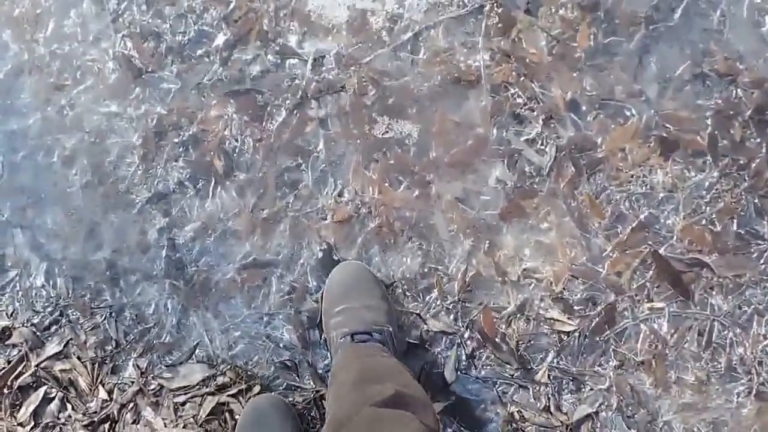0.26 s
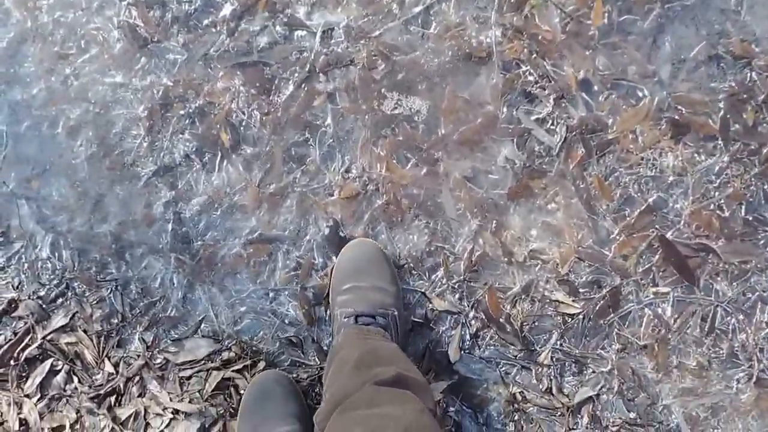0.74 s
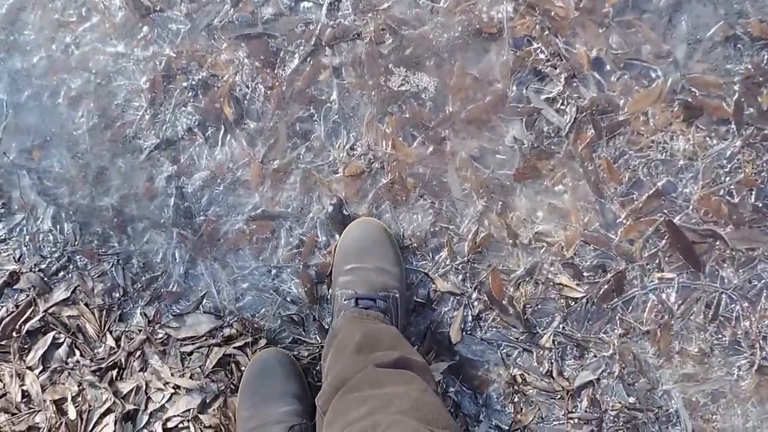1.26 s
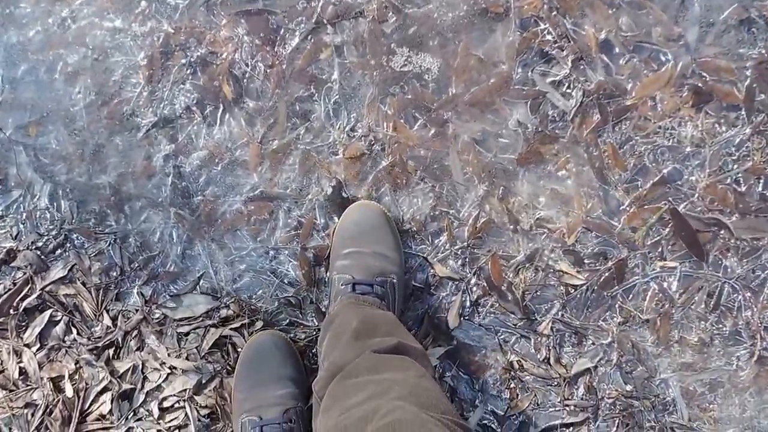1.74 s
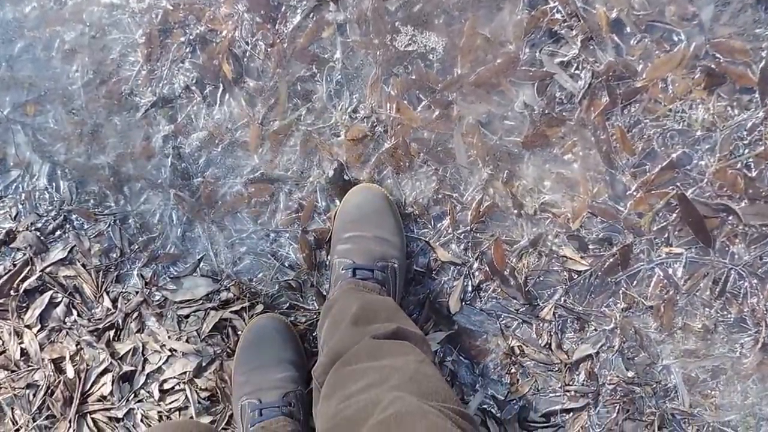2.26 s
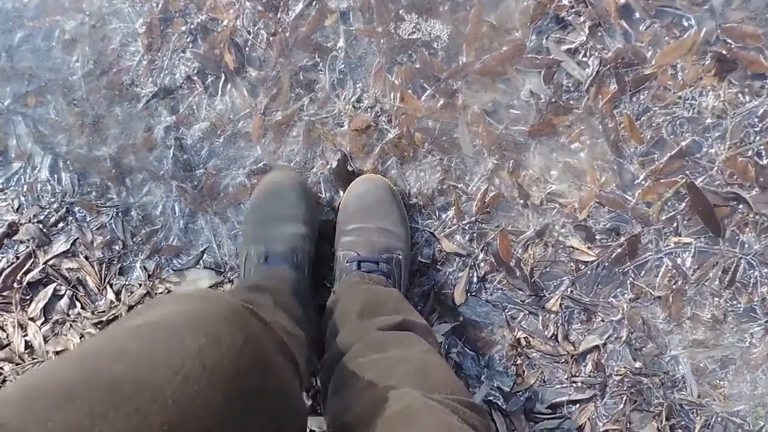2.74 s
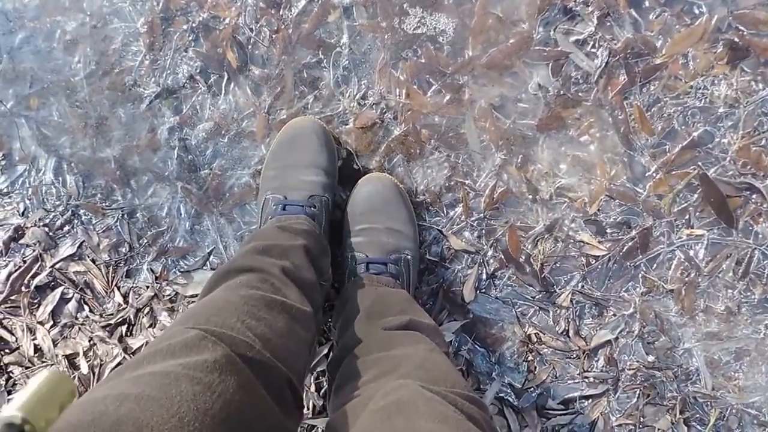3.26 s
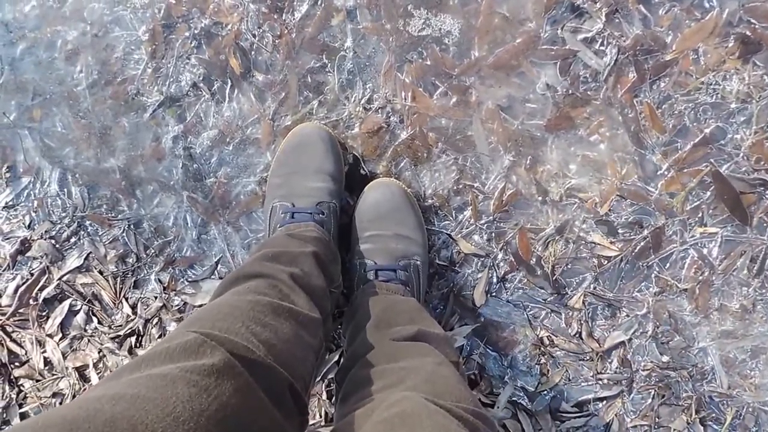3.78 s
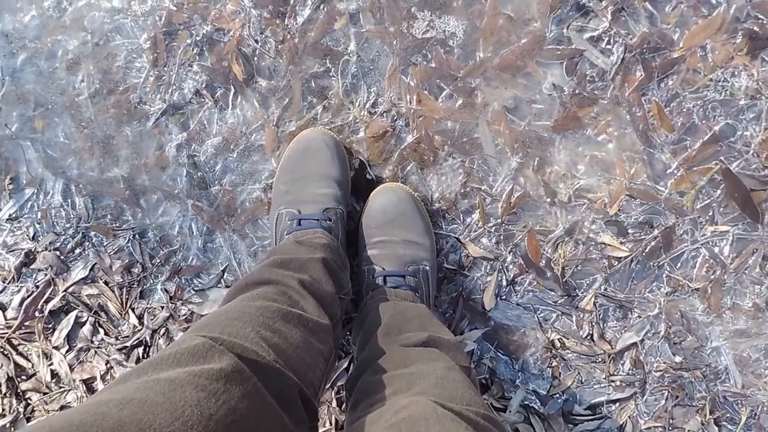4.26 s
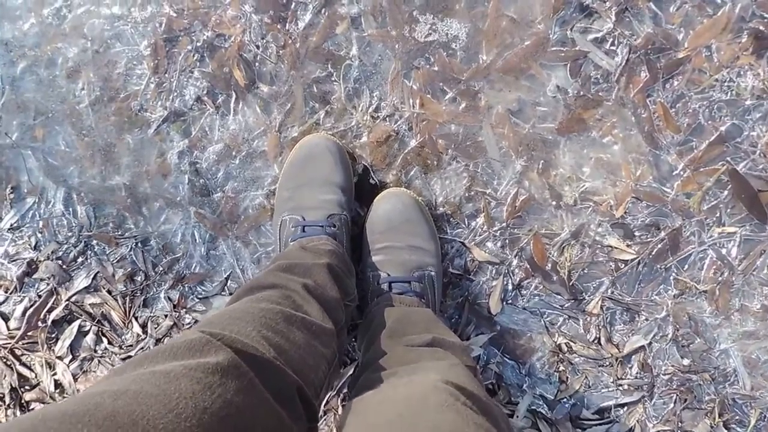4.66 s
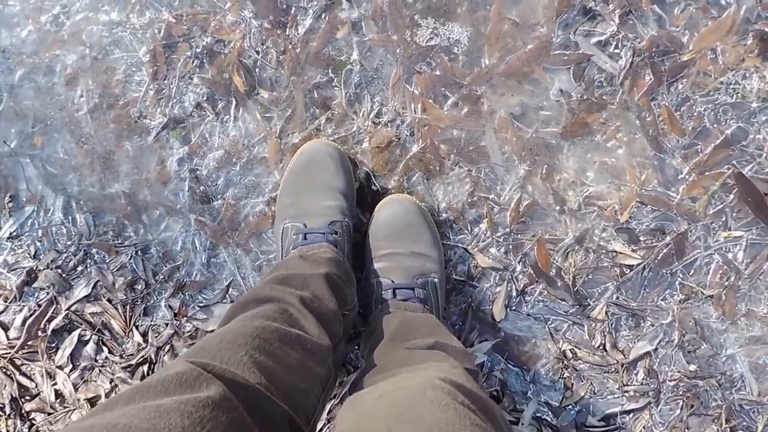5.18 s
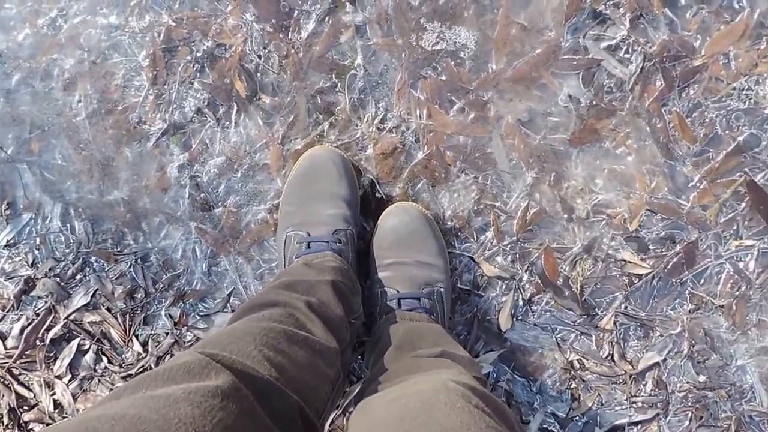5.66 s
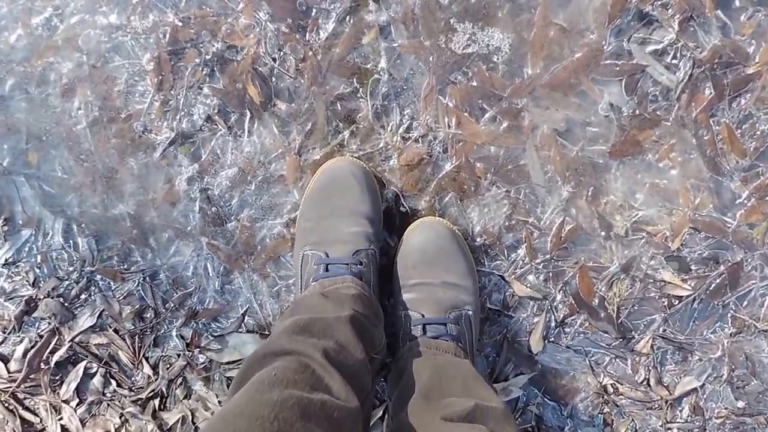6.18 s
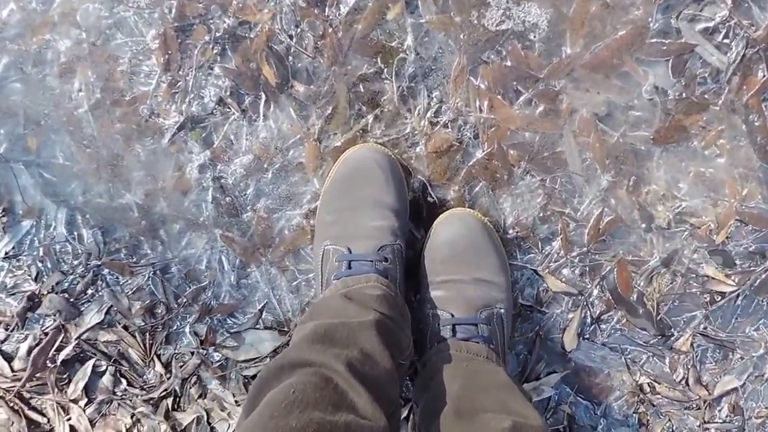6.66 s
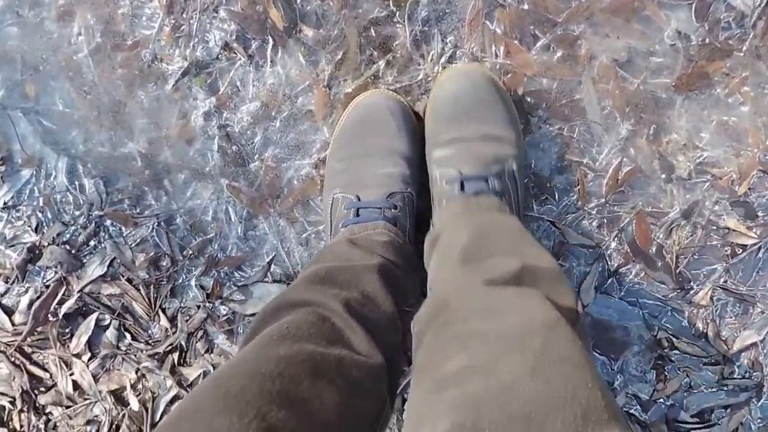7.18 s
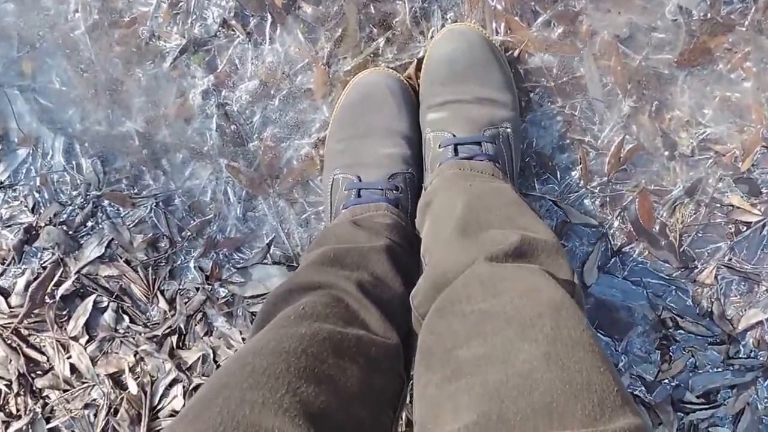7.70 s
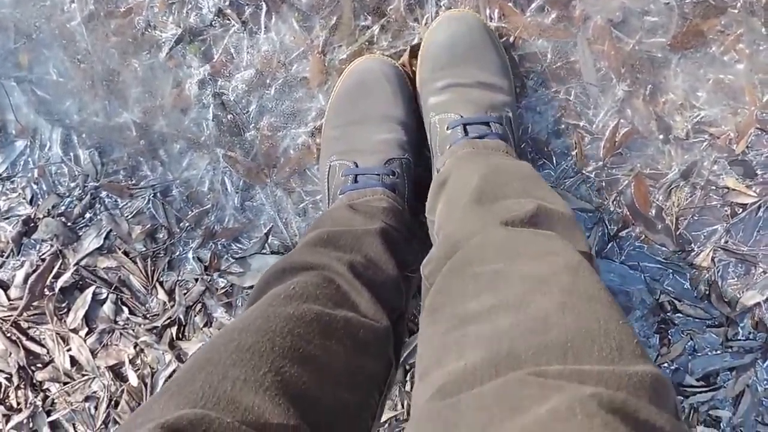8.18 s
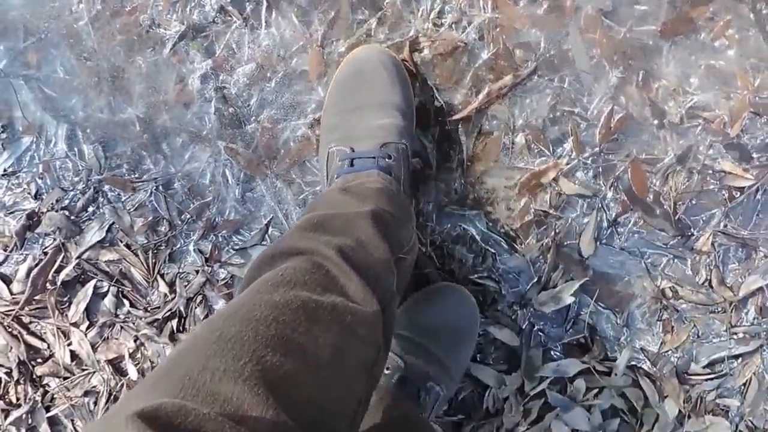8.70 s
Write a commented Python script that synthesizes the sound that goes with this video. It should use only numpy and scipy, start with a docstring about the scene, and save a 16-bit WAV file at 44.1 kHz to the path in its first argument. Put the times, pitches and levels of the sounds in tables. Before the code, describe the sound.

Outdoors, close and dry in stereo, boots press thin ice over frozen leaves above a very faint low wash and rumble. A scuff with leaf hiss and crinkle opens at 0, with small crisp snaps until 0.35, then a lull. From 0.8 dull litter grinding and cracks gather, peaking in a hard pop at 1.2 and crackling to 1.7. After sparse ticks, a step brings a loud, ringing snap at 2.54 with leaf rustle, a thin brief whistle near 2.8 and soft creaks. Medium cracks cluster at 3.2-3.9. The heaviest, thudding crunch comes at 4.6-4.9, then fades to small ticks. Low grinding at 5.8-6.4 leads into dry creaking to 7. A short skidding squeak at 7.05, a bright leaf scuff at 7.33 and a crack at 7.4 follow, then crackles, a scuff at 8.3 and faint crunching from 8.6 to the end.

```python
"""A boot scuffs: sole rub, leaf hiss and crust crinkle swell together over a low outdoor wash.
Then thin ice over frozen leaf litter cracks underfoot: each fracture snaps, rings the sheet and thuds the ground.
Noise bursts shaped by spectra make cracks, chips, crinkle and creak ticks; coloured noise makes rub, wash and
grinding; the leaf hiss blends both. Wavering harmonic tones make a thin whistle and a late skidding squeak."""
import sys
import numpy as np
from scipy import signal
from scipy.fft import rfft, irfft, next_fast_len
from scipy.io import wavfile
from scipy.ndimage import uniform_filter1d

SR = 44100
rng = np.random.default_rng(int(sys.argv[2]) if len(sys.argv) > 2 else 0)


def digitize_waveform(pressure):
    """Quantize a signal to 16-bit integers and store it at the path in sys.argv[1].

    Rows of a 2-D input are taken as channels; values are limited to [-1, 1].
    """
    field = np.atleast_2d(pressure).T
    bounded = np.clip(field, -1, 1)
    quanta = np.round(bounded * 32767).astype(np.int16)
    wavfile.write(sys.argv[1], SR, quanta)


N = 394254
TIME = np.arange(N) / SR
GRAIN_SAMPLES = 2048  # length of one break
BINS_HZ = np.fft.rfftfreq(GRAIN_SAMPLES, 1 / SR)
AGE_S = np.arange(GRAIN_SAMPLES) / SR


def amp(db):
    """Decibels to gain."""
    return 10 ** (np.asarray(db) / 20)


def evened(x):
    """Scales to rms 1."""
    return x / np.sqrt(np.mean(x ** 2) + 1e-20)


def read(points, hz):
    """Interpolates a spectrum on a log-frequency axis."""
    f, value = np.transpose(points)
    return np.interp(np.log(hz + 1), np.log(f), value)


def flutter(hz, depth_db):
    """Random gain of rms 1 that wanders up to about hz times a second."""
    f = np.fft.rfftfreq(N, 1 / SR)
    slow_spectrum = rfft(rng.standard_normal(N)) / (1 + (f / hz) ** 4)
    wander = evened(irfft(slow_spectrum, N))
    return evened(amp(depth_db * wander))


def pair(noise, likeness):
    """Two unrelated noises become what two close microphones hear: most alike in the bass."""
    a, b = rfft(noise)
    same = np.clip(read(likeness, np.fft.rfftfreq(noise.shape[1], 1 / SR)), 0, 1)
    right = same * a + np.sqrt(1 - same ** 2) * b
    return irfft(np.array([a, right]), noise.shape[1])


# Left-right likeness of sound from the boots. Each row: frequency in Hz, likeness from 0 to 1.
BOOT_LIKENESS = [(30, .96), (250, .98), (700, .92), (1500, .8), (2500, .58), (4000, .3), (8000, .12),
                 (16000, 0)]


def wash(spectrum, likeness=BOOT_LIKENESS):
    """Steady stereo noise of a given colour, rms 1."""
    size = next_fast_len(N, True)
    colour = amp(read(spectrum, np.fft.rfftfreq(size, 1 / SR)))
    noise = pair(rng.standard_normal((2, size)), likeness)
    return evened(irfft(rfft(noise) * colour, size)[:, :N])


def add(mix, s, sound):
    """Mixes a stereo sound in at s seconds."""
    part = mix[:, max(round(s * SR), 0):][:, :sound.shape[1]]
    part += sound[:, :part.shape[1]]


# Slow background contour, relative. Each row: time in seconds, level in dB.
BACKGROUND_LEVEL = [(0.0, -59), (0.74, -58), (0.94, -56), (1.09, -56), (1.59, -64.5), (1.92, -65),
                    (2.49, -54), (2.74, -62), (2.96, -61), (3.58, -58), (3.93, -68), (4.28, -65),
                    (4.76, -53.5), (4.95, -65), (5.23, -65), (5.52, -59.5), (5.88, -54), (6.1, -54.5),
                    (6.55, -58), (7.27, -56.5), (8.04, -69), (8.34, -66), (8.84, -56), (8.94, -60)]


def background():
    """Slow sinking and swelling of the background, as a gain of rms 1."""
    return evened(amp(np.interp(TIME, *np.transpose(BACKGROUND_LEVEL))))


# Outdoor wash spectrum. Each row: frequency in Hz, density in dB per Hz (relative).
WASH_SPECTRUM = [(35, -19), (60, -2), (103, -6.5), (207, -8.5), (295, -6), (400, -14), (600, -13),
                 (1000, -14.5), (1400, -17), (3500, -28.5), (7400, -36.5), (11000, -57), (16000, -31)]
# Deep rumble spectrum. Each row: frequency in Hz, density in dB per Hz (relative).
RUMBLE_SPECTRUM = [(12, -13), (24, -2.5), (33, -20), (41, -1.5), (48, -0.5), (62, -42), (100, -59),
                   (300, -82)]
# Left-right likeness of sound from all around. Each row: frequency in Hz, likeness from 0 to 1.
AROUND_LIKENESS = [(40, .9), (90, .8), (350, .76), (700, .42), (1500, .3), (4000, .2), (16000, 0)]


def outdoors():
    """A low noise wash and a deep rumble sink and swell together."""
    low_wash = amp(-55.5) * wash(WASH_SPECTRUM, AROUND_LIKENESS)
    rumble = amp(-54) * wash(RUMBLE_SPECTRUM, AROUND_LIKENESS)
    return (low_wash + rumble) * background()


PRESS_SHAPE = 1.5  # 1 = pointed swell, 2 = rounded


def swell(peak_s, rise_s, fall_s):
    """The weight comes on, peaks at 1 and eases off."""
    t = TIME - peak_s
    distance = np.maximum(-t / rise_s, t / fall_s)
    return np.exp(-np.minimum(distance, 10) ** PRESS_SHAPE)


# Shifts of weight onto the crust.
# Each row: peak in seconds, rise in seconds, fall in seconds, sole rub in dB, leaf hiss in dB, crinkle in dB.
WEIGHT_SHIFTS = [(0.0, .01, 0.057, -51.5, -48.5, -50.5), (0.111, 0.037, 0.039, -59, -54.5, -56),
                 (.28, 0.059, 0.043, -59.5, -58.5, -60), (0.831, 0.034, 0.096, -59, -61, -56.5),
                 (.98, .05, 0.043, -65, -72, -56), (1.11, 0.021, 0.041, -61, -65, -54),
                 (1.27, 0.031, 0.033, -48.5, -55, -51), (1.35, .03, 0.057, -55, -56, -59),
                 (1.455, .035, 0.026, -54, -65, -48.5), (1.541, 0.032, 0.046, -55, -56.5, -49.5),
                 (2.669, 0.062, .11, -50.5, -52.5, -51), (2.921, 0.092, 0.072, -53, -56.5, -59),
                 (3.31, 0.093, .09, -60, -83, -55.5), (3.615, .02, .04, -53, -55, -49.5),
                 (3.76, 0.057, 0.073, -49.5, -54, -61), (4.62, .07, 0.05, -56.5, -57, -48),
                 (4.711, .04, 0.06, -45, -57, -46.5), (4.88, 0.038, 0.074, -52, -64, -46.5),
                 (5.15, .14, 0.095, -58.5, -62, -56.5), (5.64, 0.046, 0.045, -65, -73, -57.5),
                 (5.89, 0.089, 0.064, -68, -65, -70), (6.22, .05, .08, -53.5, -94, -58),
                 (6.38, .09, .16, -49.5, -61.5, -61), (6.66, 0.12, .15, -59.5, -70.5, -73),
                 (6.98, .12, .05, -52, -66, -58.5), (7.114, 0.075, 0.038, -45, -47.5, -47.5),
                 (7.33, 0.083, 0.13, -52, -53, -52.5), (7.63, 0.11, 0.13, -52.5, -58.5, -57.5),
                 (7.839, 0.098, 0.1, -56, -62.5, -57), (8.32, 0.074, 0.051, -55.5, -58, -61.5),
                 (8.78, .04, 0.052, -53.5, -54, -51.5), (8.92, 0.083, 0.066, -52.5, -54, -54)]
# Layers: index into the three levels, rest level in dB, dB followed per dB of background
RUB_TREAD, HISS_TREAD, CRINKLE_TREAD = (0, -63.5, 0.5), (1, -66, 0.54), (2, -73, 0.45)


def tread(layer, rest_db, follow_db_per_db):
    """Gain of one layer: a faint rest level that follows the background, plus a swell per press, summed in power."""
    power = (amp(rest_db) * background() ** follow_db_per_db) ** 2
    for peak_s, rise_s, fall_s, *levels_db in WEIGHT_SHIFTS:
        power += (amp(levels_db[layer]) * swell(peak_s, rise_s, fall_s)) ** 2
    return np.sqrt(power)


# Sole rub spectrum. Each row: frequency in Hz, density in dB per Hz (relative).
RUB_SPECTRUM = [(200, -34), (600, -10), (1100, 1), (1900, 3), (2500, 1), (3500, 1), (5000, -7),
                (8000, -18.5), (16000, -38)]


def soles():
    """Rubber rubs over the crust in small jerks: coloured noise with a fast random gain."""
    return wash(RUB_SPECTRUM) * flutter(hz=148, depth_db=3.5) * tread(*RUB_TREAD)


def fracture(t60_s, tearing, late_db):
    """Drive of one break: sudden release, a swelling and dying run of tiny breaks, faint scatter off the ground."""
    noise = rng.standard_normal((2, GRAIN_SAMPLES))
    lumps_db = 4 * np.repeat(rng.standard_normal(GRAIN_SAMPLES // 32), 32)
    decay_db = -60 * AGE_S / max(t60_s, .001)
    onset = AGE_S / (AGE_S + .00015)
    run = evened(noise * amp(lumps_db + decay_db) * onset)
    scatter = evened(noise * amp(-60 * AGE_S / .05))
    drive = pair(tearing * run + amp(late_db) * scatter, BOOT_LIKENESS)
    left_delay_samples = rng.integers(3)  # the left port hears the release 0-2 samples after the right
    drive[[0, 1], [left_delay_samples, 0]] += np.sqrt(GRAIN_SAMPLES)
    return drive


def ring(drive, colour_db, lag_s=0):
    """Passes a drive through a causal (minimum-phase) colour; rms 1 when counted over 10 ms."""
    cepstrum = irfft(np.log(amp(np.maximum(colour_db, -100))))
    cepstrum[1:GRAIN_SAMPLES // 2] *= 2
    cepstrum[GRAIN_SAMPLES // 2 + 1:] = 0
    delay_s = lag_s / (1 + (BINS_HZ / 900) ** 2)  # bending waves: low notes travel slowly, arrive last
    bend_rad = 2 * np.pi * np.cumsum(delay_s) * SR / GRAIN_SAMPLES
    sound = irfft(rfft(drive) * np.exp(rfft(cepstrum) - 1j * bend_rad))
    return evened(sound) * np.sqrt(SR / 100 / GRAIN_SAMPLES)


def shard(hz, sharpness, uneven_db):
    """Colour in dB of one piece of ice: a broad main resonance among uneven side modes."""
    detune = (BINS_HZ + 1) / hz - hz / (BINS_HZ + 1)
    resonance_db = -10 * np.log10(1 + (sharpness * detune) ** 2)
    side_modes = np.interp(np.log(BINS_HZ + 1), np.linspace(4, 10, 30), rng.standard_normal(30))
    return resonance_db + uneven_db * side_modes


def splinter(uneven_db):
    """Colour in dB of one small splinter: random peaks and dips evenly spaced in Hz."""
    return uneven_db * np.interp(BINS_HZ, np.linspace(0, SR / 2, 18), rng.standard_normal(18))


def grains(colours, per_s, spread_db):
    """A random shower of tiny breaks, each in one of the given colours; few are large. Rms 1."""
    out = np.zeros((2, N))
    size_db = spread_db * np.minimum(rng.exponential(1, N), 3)
    size = amp(size_db) * (rng.random(N) < per_s / SR)
    piece = rng.integers(len(colours), size=N)
    for k, colour in enumerate(colours):
        tick = ring(fracture(.003, .6, late_db=-20), colour)
        hits = (size * (piece == k))[None]
        out += signal.oaconvolve(hits, tick, axes=1)[:, :N]
    return evened(out)


# Leaf hiss spectrum. Each row: frequency in Hz, density in dB per Hz (relative).
LEAF_SPECTRUM = [(1500, -36), (3500, -10), (5500, -2.5), (8000, -2), (11000, -1.5), (14000, -3),
                 (16000, -20)]
# Quick scuffs through dry leaves. Each row: peak in seconds, time to 1/e in seconds, level in dB.
LEAF_SCUFFS = [(0.005, 0.024, -53), (0.808, 0.009, -49.5), (2.643, 0.026, -43.5), (3.603, 0.023, -55),
               (7.327, 0.013, -37.5), (8.32, 0.014, -45.5), (8.779, 0.028, -64)]


def leaves(count):
    """Frozen leaves and ice dust: a sizzle of splinter breaks over a noise hiss, louder in each scuff."""
    colours = [read(LEAF_SPECTRUM, BINS_HZ) + splinter(uneven_db=2) for _ in range(count)]
    sizzle = grains(colours, per_s=1100, spread_db=5.5)
    hiss = amp(-4.0) * wash(LEAF_SPECTRUM)
    scuffs = sum(amp(db) * np.exp(-((TIME - s) / half_s) ** 2) for s, half_s, db in LEAF_SCUFFS)
    return evened(sizzle + hiss) * np.hypot(tread(*HISS_TREAD), scuffs)


# Crust spectrum, for crinkle and creaks. Each row: frequency in Hz, density in dB per Hz (relative).
CRUST_SPECTRUM = [(200, 8.5), (600, 3.5), (1100, 0.5), (2100, 7), (3400, -3.5), (5000, -10), (8000, -29),
                  (11000, -5), (16000, 1)]


def crinkle(count):
    """Small pieces of crust give way, each ringing at one of a set of pitches."""
    pitches_hz = np.geomspace(1400, 4200, count)
    crust_db = read(CRUST_SPECTRUM, BINS_HZ)
    colours = [crust_db + shard(hz, sharpness=.6, uneven_db=2) for hz in pitches_hz]
    return grains(colours, per_s=190, spread_db=5) * tread(*CRINKLE_TREAD)


# Ice sheet ring spectrum. Each row: frequency in Hz, density in dB per Hz (relative).
SHEET_SPECTRUM = [(100, -33), (350, -5), (600, -6), (1000, 2.5), (1400, -2), (2100, 2), (3400, -2),
                  (4800, -6.5), (8000, -15), (16000, -25)]
# Ground thud spectrum. Each row: frequency in Hz, density in dB per Hz (relative).
THUD_SPECTRUM = [(30, -23), (75, -2.5), (160, -1.5), (260, 0), (450, -4), (700, -11.5), (1500, -59),
                 (5000, -98)]
# Treble snap spectrum. Each row: frequency in Hz, density in dB per Hz (relative).
SNAP_SPECTRUM = [(500, -78), (2500, -12), (4500, 0.5), (6500, 2.5), (8500, 1.5), (11000, 4), (13000, 2.5),
                 (16000, 6)]
TEAR_S = 0.0087  # longer fractures are mostly tearing, short ones a single pop
SNAP_TEARING, SNAP_LENGTH = 2.2, 1.08  # ratios to the ring's tearing and t60
THUD_T60_S = 0.019
BEND = 0.1192  # lag of the low notes, ratio to the ring's t60
RING_SCATTER_DB, THUD_SCATTER_DB, SNAP_SCATTER_DB = -12.5, -6, -12  # return off the ground
PAN_DB, PAN_SPREAD_DB = -0.5, 0.5  # left minus right: near the middle, under either boot


def crack(ring_db, hz, sharpness, t60_s, thud_db, snap_db):
    """One fracture rings the sheet, thuds the ground and snaps in the treble."""
    tearing = np.clip(t60_s / TEAR_S, .3, 1.6)
    colour = read(SHEET_SPECTRUM, BINS_HZ) + shard(hz, sharpness, uneven_db=1.4)
    body = ring(fracture(t60_s, tearing, RING_SCATTER_DB), colour, lag_s=BEND * t60_s)
    thud_drive = fracture(THUD_T60_S, tearing=0.28, late_db=THUD_SCATTER_DB)
    thud = ring(thud_drive, read(THUD_SPECTRUM, BINS_HZ))
    snap_drive = fracture(SNAP_LENGTH * t60_s, SNAP_TEARING * tearing, SNAP_SCATTER_DB)
    snap = ring(snap_drive, read(SNAP_SPECTRUM, BINS_HZ) + splinter(uneven_db=2.5))
    side_db = np.array([[.5], [-.5]]) * (PAN_DB + PAN_SPREAD_DB * rng.standard_normal())
    # direction tells most in the treble: full pan on the snap, half on the ring, none on the thud
    return amp(ring_db + .5 * side_db) * body + amp(thud_db) * thud + amp(snap_db + side_db) * snap


CHIPS_PER_S, PRESSED_CHIPS_PER_S = 2.0, 12.0  # at rest; added at full weight
CHIP_HZ, CHIP_OCTAVES, CHIP_Q, CHIP_T60_S = 1700, 0.58, 0.62, 0.0078  # octaves: pitch spread
CHIP_DB, CHIP_THUD_DB, CHIP_SNAP_DB, CHIP_SPREAD_DB = 5, -5.5, 10.5, 1  # first three: over the crinkle gain


def chips():
    """Faint random-pitched fractures, more frequent under weight and scaled by the crinkle gain."""
    out = np.zeros((2, N))
    weight = sum(swell(*row[:3]) for row in WEIGHT_SHIFTS)
    due = np.cumsum(CHIPS_PER_S + PRESSED_CHIPS_PER_S * weight) / SR  # running count
    for k in range(int(due[-1])):
        s = np.interp(k + rng.random(), due, TIME)
        size_db, octaves = rng.standard_normal(2) * [CHIP_SPREAD_DB, CHIP_OCTAVES]
        hz = CHIP_HZ * 2 ** octaves
        chip = crack(CHIP_DB, hz, CHIP_Q, CHIP_T60_S, CHIP_THUD_DB, CHIP_SNAP_DB)
        add(out, s, amp(size_db) * chip)
    return out * tread(*CRINKLE_TREAD)


# Fractures that stand out. Each row: start in seconds, ring level in dB over 10 ms, ring pitch in Hz,
# ring sharpness (Q), ring t60 in seconds, thud level in dB, snap level in dB.
FRACTURES = [(.0933, -50, 1980, .3, 0.0036, -60, -45), (.126, -49, 1820, 0.55, .002, -57, -53),
             (.261, -60, 600, 0.33, 0.01, -51, -42.5), (0.2891, -48, 1160, .3, 0.012, -53, -34.5),
             (0.2967, -54, 1330, .3, 0.01, -53, -32.5), (0.3408, -56, 600, .3, 0.0066, -54, -41),
             (.9409, -36.5, 595, 1.2, 0.0047, -40, -43), (0.9891, -36, 1890, .9, 0.0044, -68, -49),
             (1.0027, -39, 1050, 2.7, 0.0035, -44.5, -44.5),
             (1.0787, -38.5, 1230, 1.2, 0.0072, -47.5, -46.5), (1.1042, -34.5, 1030, 1.4, 0.0017, -48, -52),
             (1.2115, -21.5, 1030, 0.59, 0.0064, -38, -28), (1.2567, -30, 1590, 2.3, 0.0066, -54, -32),
             (1.293, -44, 607, 1.1, .012, -53, -46), (1.328, -43, 1110, 0.71, .0025, -70, -46),
             (1.333, -45, 1110, .3, 0.022, -69, -46), (1.344, -51, 1890, .3, 0.024, -67, -43),
             (1.36, -42.5, 1089, 1.5, 0.0065, -54, -39), (1.381, -40.5, 2405, 0.75, .0036, -69, -42),
             (1.4578, -44, 2300, 2.5, 0.0027, -66, -44), (1.4636, -33, 690, 0.25, 0.0226, -39, -39.5),
             (1.5325, -38, 1825, 1.25, 0.015, -70, -37), (1.6843, -39, 3000, 2.4, 0.006, -75, -43.5),
             (2.139, -43.5, 2000, 3.3, .012, -57, -45), (2.2158, -56, 600, 0.4, 0.0078, -75, -47),
             (2.5413, -21, 1320, 1.2, 0.03, -30, -27), (2.5425, -26, 258, 1.7, 0.013, -37, -41),
             (2.6225, -34.5, 4220, 0.9, 0.008, -70, -34.5), (2.6283, -35, 1417, 0.31, 0.016, -51, -40),
             (2.647, -36, 1590, 0.95, 0.048, -50, -34.5), (2.6692, -45, 1890, 2.9, 0.0044, -69, -50),
             (2.6925, -47, 600, 2.6, 0.0035, -50, -57), (2.7766, -41, 1434, 2.7, 0.0022, -65, -55),
             (2.983, -57, 607, 0.31, 0.027, -50, -61), (3.0056, -43.5, 2030, 2.8, 0.0023, -53, -43),
             (3.2418, -42.5, 2296, 1.8, 0.0027, -77, -46.5), (3.324, -47, 1596, 0.32, 0.014, -60, -64),
             (3.346, -35, 3670, .6, 0.017, -64, -40), (3.4, -42, 1926, 2.9, 0.0074, -72, -49),
             (3.47, -31, 1150, .65, 0.017, -42.5, -36.5), (3.6076, -48.5, 1887, 0.92, 0.017, -69, -51),
             (3.6929, -31.5, 1263, 1, .022, -46, -32.5), (3.7165, -39, 3520, 3.4, 0.0056, -47.5, -41),
             (3.755, -47, 4220, 0.34, .005, -54, -44), (3.7672, -35, 1720, 0.73, 0.0093, -46, -35),
             (3.8503, -45, 4210, 0.66, 0.0035, -67, -39), (3.8795, -34.5, 2030, 0.75, 0.026, -50, -33),
             (4.0921, -53, 2040, .5, 0.0044, -79, -54), (4.6086, -34, 1183, 1.1, 0.0048, -47.5, -29.5),
             (4.619, -47, 1818, 1.13, 0.016, -68, -55), (4.6795, -28, 1955, 3.4, 0.0043, -43, -37.5),
             (4.7158, -22, 600, 0.39, 0.019, -24, -26.5), (4.723, -30.5, 936, 3.1, 0.022, -25, -54),
             (4.7732, -30.5, 596, 0.32, 0.021, -31.5, -32), (4.8493, -34.5, 1418, .4, 0.024, -42.5, -37),
             (4.882, -27.5, 1430, 1.25, 0.016, -36.5, -31), (4.9152, -44, 1450, 2.3, 0.011, -66, -45),
             (5.0273, -46, 696, .36, 0.01, -60, -49), (5.1649, -46, 1892, 1.83, .015, -80, -64),
             (5.234, -47.5, 3070, 0.33, 0.0059, -78, -49), (5.26, -45.5, 1662, .5, 0.026, -56, -44),
             (5.5567, -50, 1354, 1.8, 0.0091, -63, -50), (5.665, -47.5, 1390, 0.15, 0.025, -65, -45.5),
             (5.896, -43, 626, 0.47, 0.012, -43, -41.5), (6.216, -36.5, 2820, 0.43, 0.006, -46, -35),
             (6.2966, -38.5, 600, 1.3, 0.014, -39.5, -53), (6.314, -46, 604, 2.3, 0.017, -36.5, -72),
             (6.3309, -34.5, 3020, 2.1, 0.0043, -64, -38), (6.556, -40.5, 2000, 1.6, .011, -73, -40.5),
             (6.9809, -37, 3190, 7.4, 0.0032, -70, -42.5), (7.1142, -34.5, 890, 0.37, 0.018, -41, -37.5),
             (7.129, -39, 1888, .2, 0.007, -68, -44), (7.1728, -52.5, 1220, .3, .005, -59, -46),
             (7.3256, -40.5, 3345, 1.7, .028, -50, -43), (7.3698, -51, 780, .3, 0.0054, -68, -46),
             (7.395, -27.5, 1700, 1.06, 0.0098, -51, -31.5), (7.4396, -45, 2313, 3.4, 0.005, -67, -67),
             (7.607, -44, 4060, 1.09, 0.0094, -57, -41), (7.656, -36, 2075, 1.23, 0.025, -39, -40),
             (7.668, -43.5, 2262, 1.1, .015, -56, -44), (7.7501, -39.5, 2750, 2.2, 0.0058, -56, -45),
             (7.7713, -42.5, 1840, 2.7, 0.023, -50.5, -46), (7.846, -40, 1630, 0.77, 0.015, -56, -42.5),
             (7.9644, -41, 1640, 0.84, 0.0017, -55, -45), (8.0157, -41.5, 1370, 0.23, 0.004, -58, -51),
             (8.6349, -48, 1610, .8, 0.014, -75, -46), (8.763, -56, 688, 0.34, 0.025, -54, -38.5),
             (8.8129, -65, 2258, 1.47, 0.0013, -64, -37), (8.846, -42, 863, 1.6, 0.031, -54, -58),
             (8.8609, -45, 653, 1.4, 0.013, -51.5, -47)]


def cracks():
    """The sheet breaks under the boots; the big break at 2.54 s takes two rows, a high ring and a low one."""
    out = np.zeros((2, N))
    for s, *shape in FRACTURES:
        add(out, s, crack(*shape))
    return out


# Litter spectrum. Each row: frequency in Hz, density in dB per Hz (relative).
LITTER_SPECTRUM = [(80, -35), (200, 0), (400, -4), (800, -7), (1300, -11.5), (2500, -30), (8000, -50)]
# Frozen litter grinding deep under the weight. Each row: start in seconds, end in seconds, level in dB.
LITTER_GRINDS = [(0.798, 1.206, -57.5), (2.255, 2.543, -66), (5.801, 6.165, -53.5), (6.24, 6.452, -60.5),
                 (8.75, 8.942, -62)]


def grinding():
    """Packed leaves give way in dull lumps: low noise with a random gain under half-ellipse swells."""
    level = np.zeros(N)
    for start, end, db in LITTER_GRINDS:
        arch = np.sqrt(np.clip(4 * (TIME - start) * (end - TIME), 0, None)) / (end - start)
        level += amp(db) * arch
    return wash(LITTER_SPECTRUM) * flutter(hz=70, depth_db=5.5) * level


# Loaded sole sticks and slips. Each row: start in seconds, end in seconds, slips per second, level in dB.
SLIP_TRAINS = [(2.7, 2.96, 70, -57), (3.02, 3.33, 60, -58), (5.03, 5.28, 50, -60), (6.16, 6.34, 75, -51),
               (6.345, 6.51, 88, -49.5), (6.58, 6.99, 30, -55), (7.54, 7.88, 80, -52)]


def creaks():
    """Under load the sole lets go in a nearly even train of small dry ticks."""
    out = np.zeros((2, N))
    for start, end, per_s, db in SLIP_TRAINS:
        draws = rng.standard_normal((48, 3))  # gap, size, pitch
        times = start + np.cumsum(np.exp(.19 * draws[:, 0])) / per_s
        for s, (_, size, pitch) in zip(times[times < end], draws):
            hz = 2500 * np.exp(.08 * pitch)
            colour = read(CRUST_SPECTRUM, BINS_HZ) + shard(hz, sharpness=1.0, uneven_db=3.5)
            tick = ring(fracture(.002, .2, late_db=-26), colour)
            add(out, s, amp(db + 2.5 * size) * tick)
    return out


def squeak(rows, partials_db, waver, hiss_db):
    """Fast stick and slip: a wavering tone with overtones, roughened by the grain of the ice."""
    s, hz, db = np.transpose(rows)
    t = np.arange(s[0], s[-1], 1 / SR)

    def smoothed(width_samples):
        return evened(uniform_filter1d(rng.standard_normal(N), width_samples)[:len(t)])

    drift, grain = smoothed(130), smoothed(24)
    turns = np.cumsum(np.interp(t, s, hz) * (1 + waver * drift)) / SR
    tone = sum(amp(level) * np.sin(2 * np.pi * k * turns) for k, level in enumerate(partials_db, 1))
    rough = evened(tone * (1 + amp(hiss_db) * grain))
    sound = rough * amp(np.interp(t, s, db)) * signal.windows.tukey(len(t), .1)
    out = np.zeros((2, N))
    add(out, s[0], np.array([sound, sound]))
    return out


# Whistle contour. Each row: time in seconds, pitch in Hz, level in dB.
WHISTLE_PATH = [(2.778, 1730, -49), (2.795, 1738, -49), (2.812, 1635, -48), (2.826, 1730, -57),
                (2.845, 1804, -56), (2.88, 1834, -63)]


def whistle():
    """The settling boot draws a thin whistle from the ice: fundamental and a weak octave."""
    return squeak(WHISTLE_PATH, partials_db=[0, -17], waver=.025, hiss_db=-5)


# Skid contour. Each row: time in seconds, pitch in Hz, level in dB.
SKID_PATH = [(7.02, 1020, -51), (7.042, 1046, -44.5), (7.056, 1359, -45), (7.07, 1392, -44),
             (7.083, 1267, -52), (7.093, 1039, -43), (7.106, 980, -46), (7.115, 950, -60)]


def skid():
    """The sole skids and squeaks: three equal harmonics and a weaker fourth."""
    return squeak(SKID_PATH, partials_db=[0, 0, 0, -8], waver=.016, hiss_db=-6)


def scene():
    """Ice, boots and leaves in the open air."""
    steady = outdoors() + soles() + leaves(count=8) + crinkle(count=10)
    breaks = chips() + cracks()
    return steady + breaks + grinding() + creaks() + whistle() + skid()


# Colour difference of the two microphone ports. Each row: frequency in Hz, left minus right in dB.
PORT_BALANCE = [(50, -1), (250, -0.7), (800, -0.5), (1300, 1), (2300, -3), (3300, -1.2), (4900, 1.5),
                (7200, 1.5), (10500, -4.5), (13500, 0.5), (16000, 0)]
EDGE_HZ = 16100


def record(dry):
    """Each microphone port has its own colour; then a low-pass at the band edge."""
    tilt_db = read(PORT_BALANCE, np.fft.rfftfreq(N, 1 / SR))
    port_gain = amp(np.array([tilt_db, -tilt_db]) / 2)
    heard = irfft(rfft(dry) * port_gain, N)
    lowpass = signal.firwin(255, EDGE_HZ, window=("kaiser", 8), fs=SR)
    return signal.oaconvolve(heard, lowpass[None], "same")


dry = scene()
out = record(dry)
digitize_waveform(out)
```